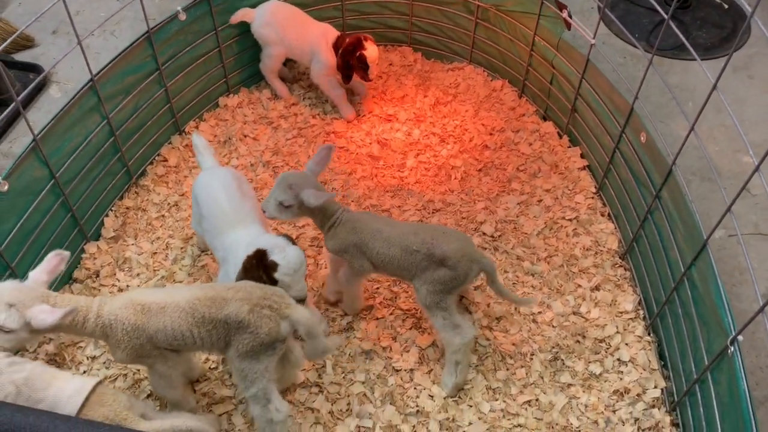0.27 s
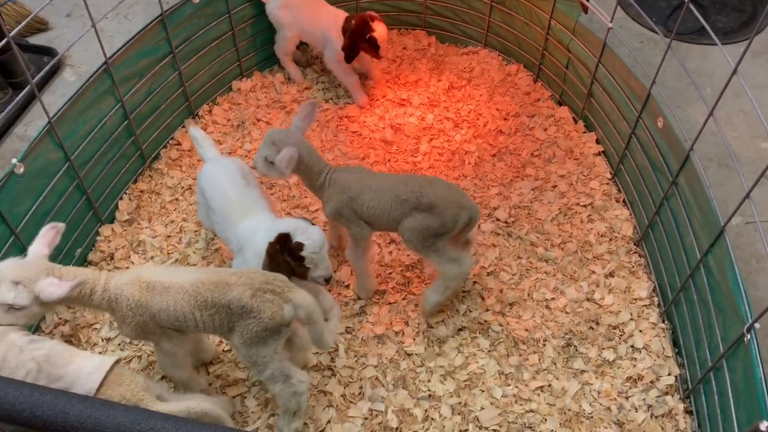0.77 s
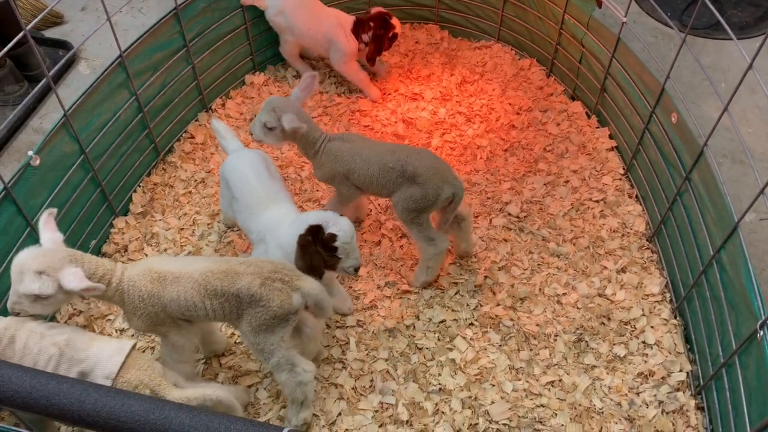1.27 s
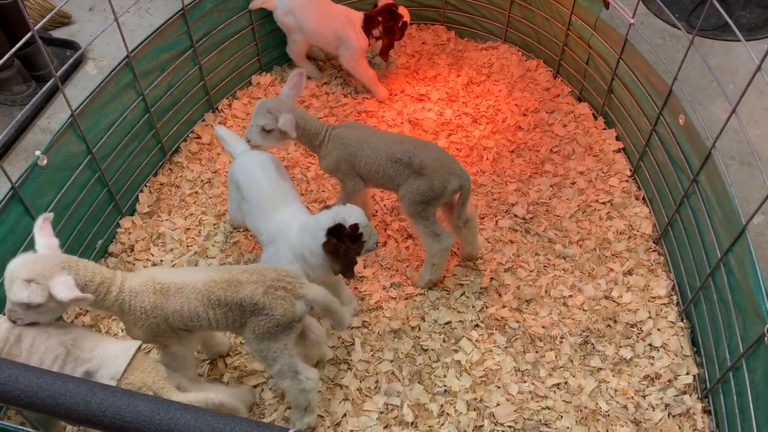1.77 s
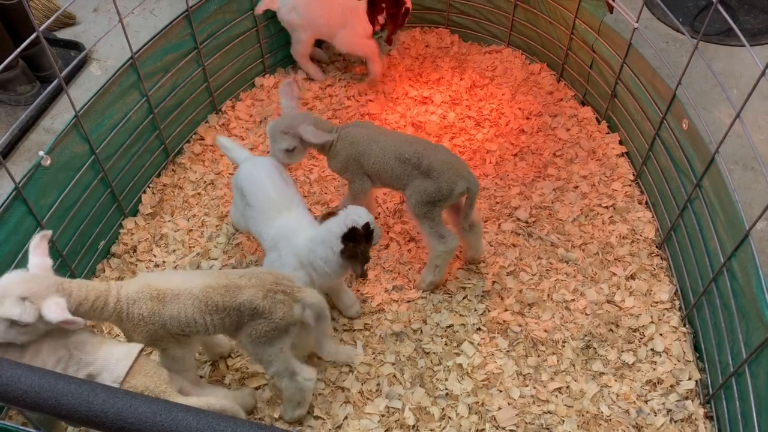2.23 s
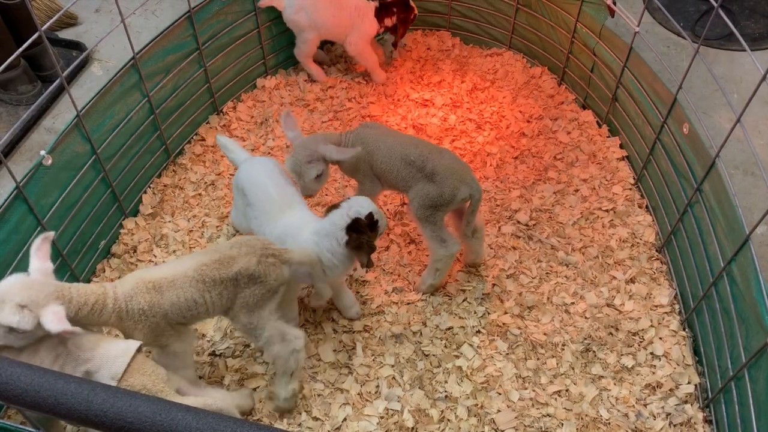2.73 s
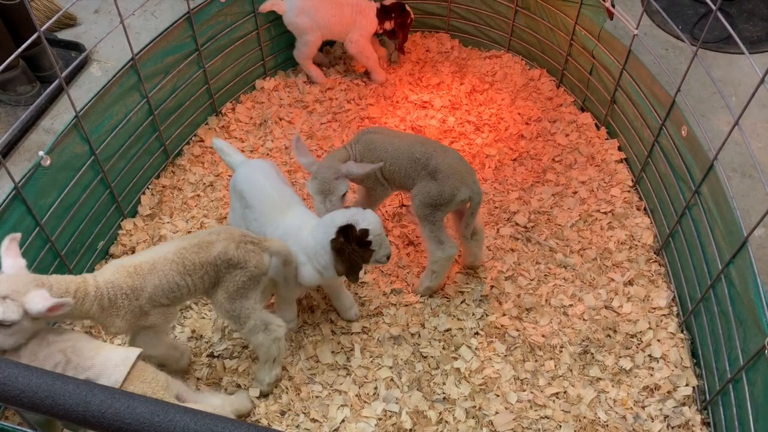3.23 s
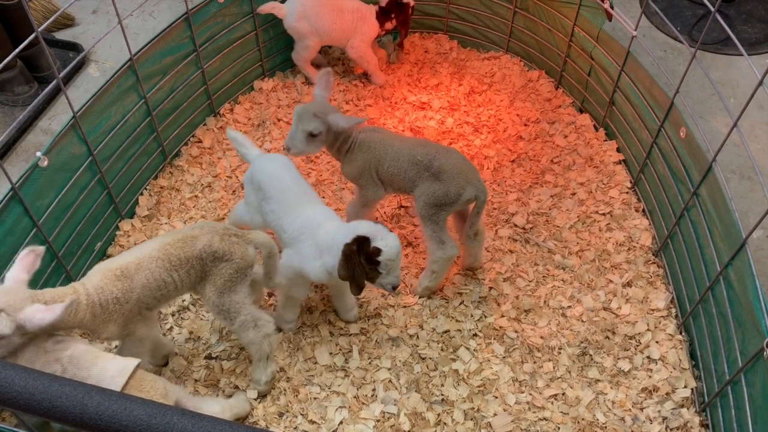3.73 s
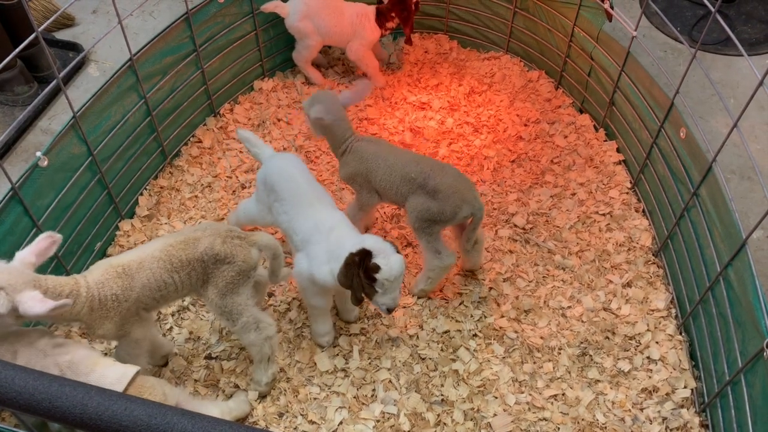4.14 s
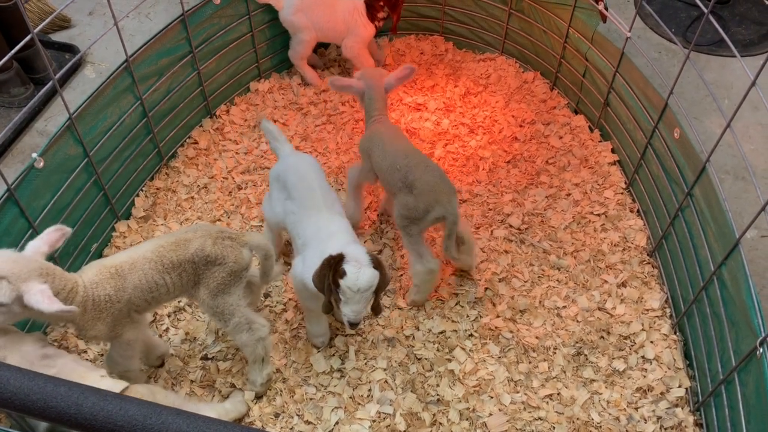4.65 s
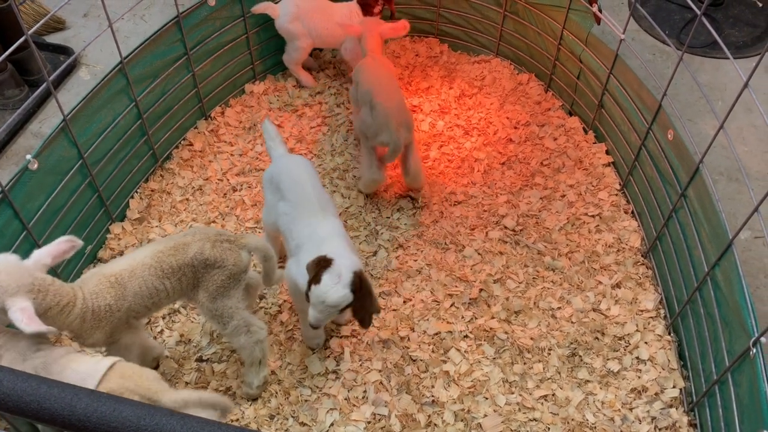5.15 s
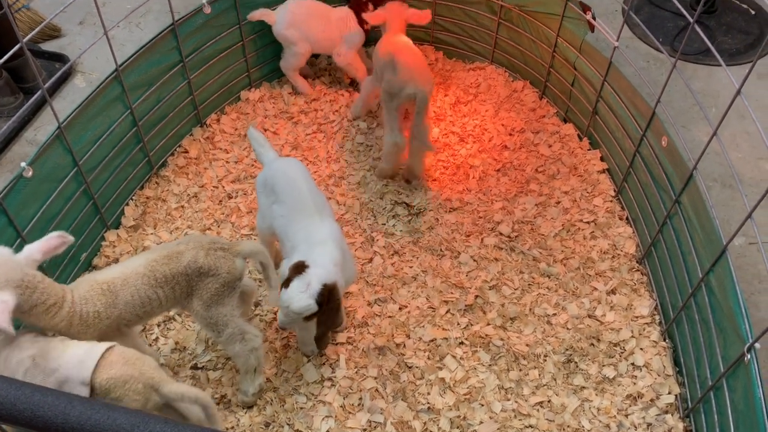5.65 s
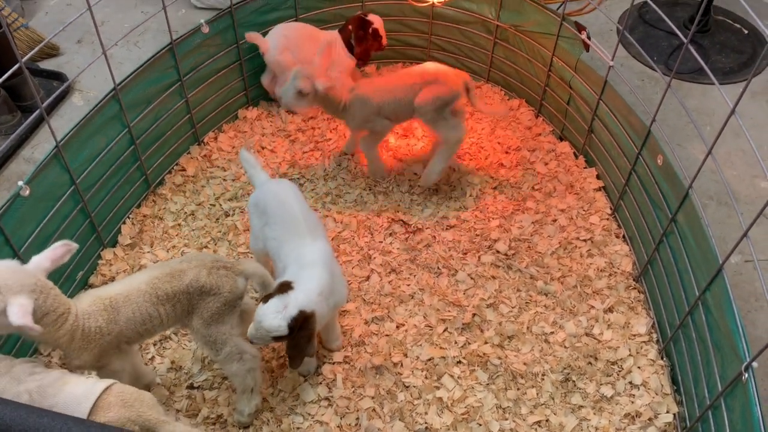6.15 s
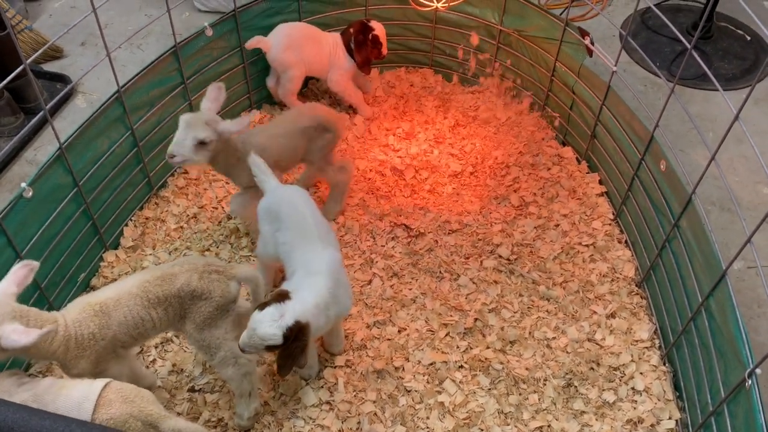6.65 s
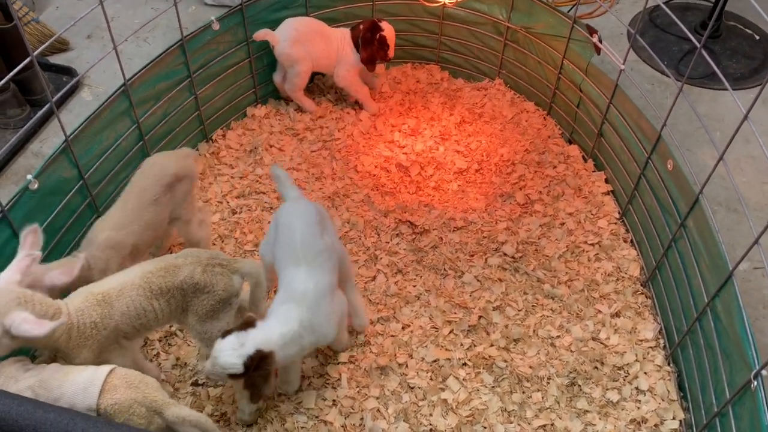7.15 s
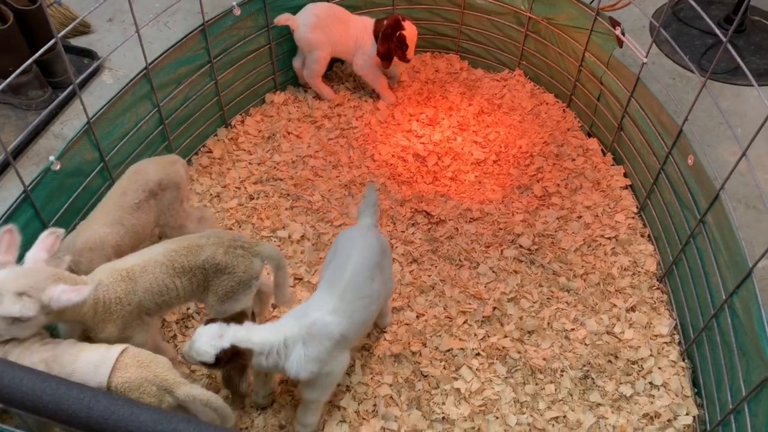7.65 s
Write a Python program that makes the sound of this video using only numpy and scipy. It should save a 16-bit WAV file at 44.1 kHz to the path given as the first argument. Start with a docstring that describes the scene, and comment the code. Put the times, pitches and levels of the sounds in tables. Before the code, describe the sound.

The tail end of a lamb's bleat echoes in a barn, then small hooves rustle and crackle through wood shavings over a low hum.

```python
"""Lamb's bleat and young animals in wood shavings

The end of a lamb's bleat, harmonics through moving throat resonances, rings out in a barn's noise tail.
Young animals then shuffle (banded clicks and hiss), snap flakes (ringing bursts), land hooves (decaying
modes) and scrape (resonant grains) inside a wire pen. Hum lines and ventilation noise lie behind.
Two microphone ports hear the treble a fraction of a millisecond apart."""
import sys
import numpy as np
from scipy import signal
from scipy.fft import rfft, irfft, next_fast_len
from scipy.io import wavfile
from scipy.ndimage import uniform_filter1d

SR = 44100
rng = np.random.default_rng(int(sys.argv[2]) if len(sys.argv) > 2 else 0)


def transcribe(u):
    """Save the signal u as a 16-bit wav file named by the first command-line argument.

    u: samples, shape (n,) or (channels, n), limited to [-1, 1]; the rate is SR.
    q: integer samples, one column per channel.
    """
    v = np.clip(np.atleast_2d(u).T, -1, 1)
    q = np.round(v * 32767).astype(np.int16)
    wavfile.write(sys.argv[1], SR, q)


N = 347949
T = np.arange(N) / SR

# vocal folds and throat over time: t/s, pitch f/Hz, level/dB, roughness 0-1, middle resonance/dB,
# upper resonance f/Hz, upper resonance/dB, half-pitch lines/dB
CALL = [(0, 764.4, -27, .02, -10, 5260, 1.5, -40), (.014, 766, -25.5, .02, -10, 5400, 0, -40),
        (.024, 770, -29.5, .015, -11, 5500, 0, -40), (.033, 789, -22, .01, 3, 5600, -7, -40),
        (.04, 793, -21, .01, 5, 5630, -8, -40), (.049, 794.7, -23.5, .01, -.5, 5940, -7, -40),
        (.059, 797.2, -20.5, 0, -2.5, 6200, -6.5, -40), (.069, 789.4, -24, .025, -1.5, 6300, -5, -30),
        (.075, 750, -30, .1, -3, 6500, -5, -12), (.087, 748, -26.5, .08, -10, 6500, -11, -13),
        (.096, 715, -36, .22, 2, 5900, -4, -12), (.105, 675, -34, .2, 7, 5450, 0, -11),
        (.111, 640, -32, .2, -5, 5450, -6, -9), (.119, 593.6, -26, .07, -20, 5400, -15, -12),
        (.128, 585.4, -32, .12, -20, 5400, -18, -12), (.135, 585, -44, .3, -12, 5400, -12, -8),
        (.165, 573, -55, .45, -8, 5200, -5, -6)]


def undb(db):
    """dB to gain."""
    return 10 ** (np.asarray(db) / 20)


def level(x, db):
    """Set the rms level."""
    return x * undb(db) / np.sqrt(np.mean(x ** 2))


def colour(x, points):
    """Shape a spectrum by (f/Hz, gain/dB) points, interpolated over log frequency."""
    hz, db = np.transpose(points)
    size = next_fast_len(N)
    f = np.maximum(np.arange(size // 2 + 1) * SR / size, 1)
    gain = undb(np.interp(np.log(f), np.log(hz), db))
    return irfft(rfft(x, size) * gain, size)[:N]


def walk(rate, size=N):
    """Random levels held 1 / rate s and slewed twice; spread near 1."""
    k = int(SR / rate)
    held = np.repeat(rng.standard_normal(size // k + 1), k)
    return 1.3 * uniform_filter1d(uniform_filter1d(held, k), k)[:size]


def add(out, s, x):
    """Mix x into out from time s."""
    part = out[int(s * SR):int(s * SR) + len(x)]
    part += x[:len(part)]


def resonate(x, hz, q):
    """Ring x through one resonance."""
    return signal.lfilter(*signal.iirpeak(hz, q, fs=SR), x)


def earlier_bleat():
    """The call was already sounding, so the barn is full of it: nine harmonics with a wavering pitch."""
    length_s, call_db, wobble = .25, -28, .012  # wobble: fraction of pitch
    t = T[:int(length_s * SR)]
    hz = CALL[0][1] * (1 + wobble * walk(30, size=len(t)))
    phase = 2 * np.pi * np.cumsum(hz) / SR
    shares_db = [-25, -2.0, -7, -12, -3, -1, -6, -7, -4]  # harmonics 1 to 9
    return undb(call_db) * sum(undb(db) * np.sin((k + 1) * phase) for k, db in enumerate(shares_db))


def bleat():
    """Vocal-fold harmonics weighted by throat resonances; roughness shakes them and lets breath through."""
    # resonance widths/Hz: lowest (moving), middle (fixed), upper (moving), top (fixed)
    widths_hz = (700, 1400, 1900, 3000)
    mouth_hz, mouth_rise_hz_per_s, middle_hz = 1550, 1060, 4000  # the lowest resonance climbs
    top_hz, top_db, top_fade_db_per_s = 9940, -19.5, 45  # the top resonance fades steadily through the call
    floor_db, breath_db = -17.5, -5
    s, *columns = np.transpose(CALL)
    t = T[T < s[-1]]
    hz, db, rough, mid_db, high_hz, high_db, half_db = (np.interp(t, s, c) for c in columns)
    low_hz = mouth_hz + mouth_rise_hz_per_s * t
    rough = np.clip(rough, 0, 1)
    centres_hz = (low_hz, middle_hz, high_hz, top_hz)
    gains_db = (0, mid_db, high_db, top_db - top_fade_db_per_s * t)

    def throat(f):
        """Gain at f: steep-sided peaks; a small mouth radiates little under its first resonance."""
        peaks = [undb(g) / (1 + (2 * (f - c) / w) ** 2) ** 2
                 for c, w, g in zip(centres_hz, widths_hz, gains_db)]
        floor = undb(floor_db) / (1 + (f / 7000) ** 6)
        return (sum(peaks) + floor) * np.minimum(f / low_hz, 1) ** 1.8

    phase = 2 * np.pi * np.cumsum(hz * (1 + 0.1004 * rough * walk(300, size=len(t)))) / SR
    voice = 0
    for k in np.arange(2, 37) / 2:  # unequal alternate pulses add lines half-way between harmonics
        shake = np.sqrt(1 - rough ** 2) + 0.46 * rough * walk(250, size=len(t))
        # phases staggered so the harmonics' peaks do not pile up
        line = np.sin(k * phase - np.pi * k ** 2 / 8)
        voice = voice + throat(k * hz) * shake * undb(half_db * (k % 1 > 0)) * line
    for f in range(1000, 12000, 250):  # breath: narrow noise bands through the same throat
        band = resonate(rng.standard_normal(len(t)), f, f / 300)
        voice = voice + throat(f) * rough * level(band, breath_db)
    return np.pad(voice * undb(db), (0, N - len(t)))


def barn(x, before):
    """Dense noise tail that builds up as the walls answer; each band decays at its own rate."""
    # echo bands: f/Hz, t60/s, level/dB, build-up time/s
    bands = [(500, .19, 0, .014), (1600, .56, -4, .045), (4000, .62, 0, .014), (8000, .36, 1, .012),
             (14000, .15, -4, .014)]
    barn_db = -13
    wander_s, wander_per_s = .00012, 120  # moving bodies and air blur the pitch that reaches the walls
    t, tail = T[:SR], 0
    for hz, t60_s, db, build_s in bands:
        decay = undb(db - 60 * t / t60_s) * (1 - np.exp(-(t / build_s) ** 2))
        tail = tail + resonate(rng.standard_normal(SR), hz, .8) * decay
    x = np.concatenate([before, x])
    at = np.arange(len(x))
    x = np.interp(at + SR * wander_s * walk(wander_per_s, size=len(x)), at, x)
    wet = signal.fftconvolve(x, undb(barn_db) * tail / np.sqrt(np.sum(tail ** 2)))
    return wet[len(before):len(before) + N]


def background():
    """Wavering hum over broad ventilation noise; returns the shared and the differing part."""
    # common level of hum and air over time: t/s, gain/dB
    gain_points = [(0, -11), (.1, -7.5), (.3, -2), (.6, -3.5), (.8, 0), (2, 0.5), (3.5, 0), (4.8, -1),
                   (5.3, 1.5), (6, 3.5), (6.6, 5.5), (7.2, 3), (7.89, 4)]
    # hum lines: f/Hz, rms before the common gain/dB, waver/dB
    hum_lines = [(119.8, -57.6, 1.6), (241, -79, 2.5), (274.3, -75, 3), (310.6, -73.5, 3),
                 (359.6, -63, 1.8), (171, -73.5, 1)]
    # ventilation spectrum: f/Hz, relative density/dB
    air_points = [(15, -45), (28, -21), (55, -1.5), (90, -10.5), (150, -14.5), (300, -10), (420, -15),
                  (560, -20), (750, -14.5), (1000, -15), (1500, -18), (2500, -33.5), (4500, -25),
                  (7500, -46), (8700, -32), (10200, -36), (11000, -48), (16000, -45)]
    # share of air that differs between the ports: f/Hz, gain/dB
    apart_points = [(30, -23), (100, -11.5), (300, -8.5), (650, 0.5), (1400, -7), (2600, 6.5), (4000, -23),
                    (8000, 2)]
    air_db = -60  # rms before the common gain
    common_gain = undb(np.interp(T, *np.transpose(gain_points)))
    hum = 0
    for hz, db, waver_db in hum_lines:
        wander = 0.091 * waver_db * walk(4.8)  # phase/rad
        line = np.sin(2 * np.pi * hz * T + rng.uniform(0, 2 * np.pi) + wander)
        hum = hum + level(line, db) * undb(waver_db * walk(7))
    shared, apart = (level(colour(rng.standard_normal(N), air_points), air_db) for _ in range(2))
    return common_gain * (hum + shared), common_gain * colour(apart, apart_points)


def stirring():
    """Pushes swell and die steadily in dB over faint settling; returns crisp, dull and fine rustle gains."""
    # feet pushing through shavings: peak t/s, crisp peak/dB, 10 dB rise/s, 10 dB fall/s,
    # dull share/dB, fine share/dB
    pushes = [(0.361, -57, 0.3, 0.217, 0, -10), (0.486, -56.5, 0.1, 0.05, -2, -1.0),
              (0.767, -52.0, 0.04, 0.05, -3, -5.5), (0.969, -52.5, 0.227, 0.158, -4, -3.0),
              (1.241, -54.5, 0.06, 0.103, 0, -4.5), (1.381, -56.5, 0.17, 0.05, -10.0, -4.5),
              (1.551, -60.5, 0.032, 0.023, -3.5, -5.5), (1.64, -56.5, 0.006, 0.12, 0, -26),
              (1.891, -52.5, 0.05, 0.058, -8, -3.0), (2.213, -50.5, 0.12, 0.049, -5.5, -4.0),
              (2.388, -55, 0.01, 0.04, -11, -1.5), (2.551, -54.0, 0.099, 0.041, -3.5, -4.5),
              (2.794, -50.5, 0.0551, 0.053, -4.5, -2.5), (2.883, -50, 0.049, 0.055, -3.5, -5.5),
              (3.105, -62, 0.02, 0.05, -5, -5), (3.15, -60.5, 0.04, 0.046, -3, -7),
              (3.498, -68, 2.14, 0.7, 1.5, -15), (3.695, -53.5, 0.013, 0.053, 0.5, -6),
              (3.788, -62.5, 0.07, 0.14, -6.0, -7.0), (4.045, -53.5, 0.025, 0.09, -2, -4),
              (4.17, -61, .05, .08, -3, -6), (4.337, -51.5, 0.03, 0.037, -9, -6),
              (4.514, -54.5, 0.18, 0.12, -1, -2.0), (4.725, -56.0, 0.07, 0.1, 1.0, -4.5),
              (4.82, -49, 0.06, 0.11, -5, -3.0), (5.011, -47.5, 0.039, 0.08, -2.5, -1),
              (5.144, -47, 0.126, 0.06, -7.5, -7.0), (5.334, -47.5, 0.048, 0.106, -5.5, -4),
              (5.522, -47.0, 0.006, 0.1, -7.5, -5), (5.705, -49.5, 0.015, 0.405, -3.5, -1.5),
              (5.921, -43.5, 0.06, 0.08, -9, -0.5), (6.077, -56, 0.36, 0.088, -2, -4),
              (6.177, -45, 0.023, 0.09, -0.5, -2.5), (6.254, -42, 0.054, 0.07, -6.5, -1.0),
              (6.37, -46, 0.09, 0.02, -6, -0.5), (6.436, -43, 0.03, 0.05, -12, -7),
              (6.57, -52, .015, .06, -3, -5), (6.664, -45, 0.118, 0.054, -2.5, -3.0),
              (6.772, -51.0, 0.071, 0.16, -3, -3.5), (6.884, -47.0, 0.018, 0.08, -3.0, -9.5),
              (6.94, -46, 0.03, 0.04, -11, -2.5), (7.02, -50.5, 0.026, 0.04, -1.5, -3),
              (7.142, -46.0, 0.08, 0.12, -3, -4.5), (7.297, -52.5, 0.1, 0.043, -5.0, -3.0),
              (7.5, -47.5, 0.099, 0.061, -1, -3.5), (7.651, -53.0, 0.15, 0.192, -2, -7)]
    settling_db = [[-78], [-77], [-86]]  # crisp, dull, fine
    total, t = undb(settling_db) ** 2, T[::32]
    for s, db, rise_s, fall_s, dull_db, fine_db in pushes:
        push = undb(db - 10 * np.where(t < s, (s - t) / rise_s, (t - s) / fall_s))
        total = total + (push * undb([[0], [dull_db], [fine_db]])) ** 2
    return [np.interp(T, t, np.sqrt(row)) for row in total]


def crackle(per_s, spread_db, points, patchy_db):
    """Flakes of each size click in their own band and flurries, over a hiss; sizes uneven but bounded."""
    out, together = 0, walk(90)
    low_hz, high_hz = points[1][0], points[-2][0]
    for hz in low_hz * 1.38 ** np.arange(np.log(high_hz / low_hz) // np.log(1.4) + 1):
        on = rng.random(N) < per_s / SR
        count = on.sum()
        size_db = spread_db * np.minimum(rng.exponential(size=count), 5.5)
        clicks = np.zeros(N)
        clicks[on] = rng.choice([-1, 1], count) * undb(size_db)
        grit = level(clicks, 0) + level(rng.standard_normal(N), -1.8)
        grit = grit * undb(1.1 * together + patchy_db * walk(35))
        out = out + resonate(grit, hz, 2.2) / np.sqrt(hz)
    return level(colour(out, points), 0)


def shavings(crisp, dull, fine):
    """Dry flakes crackle, finer dust hisses above them, heavier pushes add a dull scrape."""
    # flake spectrum: f/Hz, relative density/dB
    flake_points = [(1200, -14), (2500, -9.5), (4200, 1), (5200, 1.5), (6300, .5), (7500, -2.5), (9000, -2),
                    (10500, -4), (12500, -2.5)]
    # dust spectrum: f/Hz, relative density/dB
    dust_points = [(5000, -21), (7500, -7), (9000, -3), (10500, -4.5), (12000, -4), (16000, 4)]
    scrape_points = [(400, -2.5), (800, -6.5), (1500, -1), (2400, -3), (4000, -40)]  # f/Hz, gain/dB
    flakes_db, dust_db, scrape_db = -0.37, 3, -2.5
    scrape = crackle(700, 2.9, scrape_points, patchy_db=3.0)
    flakes = crackle(1500, 2.9, flake_points, patchy_db=3.0)
    dust = crackle(2500, 3.5, dust_points, patchy_db=2.2)
    return crisp * undb(flakes_db) * flakes + fine * undb(dust_db) * dust + dull * undb(scrape_db) * scrape


def snaps(crisp):
    """Flakes crack and ring briefly while crumbs rattle; small snaps fall at random, scaled by the rustle."""
    # loud single flakes: onset t/s, level/dB, ring f/Hz, ring length/cycles (peak at half of it)
    loud = [(.3117, -42, 5430, 2), (.3945, -43, 9000, 1.5), (.82, -43, 6360, 2), (.9622, -40, 11100, 2),
            (.9847, -39, 7750, 2), (1.5224, -44, 5160, 2.5), (1.641, -49, 4000, 2), (1.8635, -45, 6260, 2),
            (2.1929, -25, 9500, 3), (2.2022, -35, 6500, 2.5), (2.383, -44, 7560, 2),
            (2.5362, -43, 12000, 2), (2.5451, -32.5, 5200, 2.5), (2.5555, -41, 5500, 2),
            (2.579, -43, 13000, 3), (2.7921, -31, 9500, 2), (2.8644, -39, 6360, 2), (3.0973, -51, 8500, 2),
            (3.4081, -50, 6000, 1.5), (3.4779, -44, 8500, 2), (3.683, -48, 6000, 2), (3.8989, -52, 5860, 2),
            (4.0127, -48, 5000, 2), (4.0347, -45, 9000, 2), (4.083, -40, 8800, 3), (4.145, -38, 5500, 2),
            (4.3031, -46, 9000, 2.5), (4.3316, -30, 7500, 2.5), (4.795, -30, 7600, 2),
            (4.8797, -40, 14000, 2), (5.1741, -24, 7500, 1.5), (5.3594, -36, 11000, 2),
            (5.5172, -33, 5000, 1.5), (5.5182, -31, 6900, 8), (5.5474, -36, 7020, 3),
            (5.6984, -34, 9000, 4), (6.0771, -37, 7130, 3), (6.1749, -32, 6160, 2), (6.2594, -34, 6040, 2),
            (6.362, -36, 4500, 2), (6.4378, -23.5, 6000, 1.5), (6.6583, -33, 7130, 2),
            (6.8658, -34, 3900, 2), (7.0155, -33.5, 6360, 3), (7.1417, -33, 5720, 2),
            (7.2975, -38, 10000, 2), (7.3856, -34, 11000, 1.5), (7.8256, -45.5, 6390, 2)]
    small_per_s, small_hz, small_cycles = 30, 10000, 2
    small_db, small_spread_db = 9, 4  # above the rustle of the moment
    ring_db, crack_db, crumbs_db, crumbs_t60_s = 0, 3, -13, .03
    build_s = .001  # a flake creaks this long before it breaks
    out, t = np.zeros(N), T[:SR // 40]
    small = []
    for when, size, pitch in rng.random((int(small_per_s * N / SR), 3)):
        rustle_db = 20 * np.log10(crisp[int(when * N)])
        db = rustle_db + small_db + small_spread_db * (2 * size - 1)
        small.append((.001 + when * T[-1], db, small_hz * 2 ** (pitch - .5), small_cycles))
    for s, db, hz, cycles in list(loud) + small:
        turns = 2 * hz * t / cycles  # the ring swells, then fades
        ring = undb(ring_db) * np.sin(2 * np.pi * hz * t) * turns * np.exp(1 - turns)
        crack = undb(crack_db) * np.diff(np.exp(-t * SR / 2), prepend=0)
        crumbs = resonate(rng.standard_normal(len(t)), hz, 1.2) * undb(crumbs_db - 60 * t / crumbs_t60_s)
        add(out, s, undb(db) * crumbs * np.minimum(t / build_s, 1))
        add(out, s + build_s, undb(db) * (ring + crack))
    return out


def wire(x):
    """The pen wire scatters treble for a few milliseconds, differently on each call."""
    wire_db, t60_s, low_cut_hz = -7, .008, 3000
    t = T[:SR // 100]
    burst = rng.standard_normal(len(t)) * undb(-60 * t / t60_s)
    bright = signal.lfilter(*signal.butter(2, low_cut_hz, "high", fs=SR), x)
    return signal.fftconvolve(bright, undb(wire_db) * burst / np.sqrt(np.sum(burst ** 2)))[:N]


def hooves():
    """A soft push rings the bedded floor and the slab under it, and crunches the bedding."""
    # landings: t/s, level/dB, crunch/dB, slab/dB, nominal main mode f/Hz
    landings = [(0.759, -56, -5, -19, 138), (1.645, -47, -7, -21, 190.5), (2.179, -50, -8, -17, 165),
                (5.149, -45, -2, -2, 134), (5.208, -43.5, -7.5, 1, 136), (5.259, -45, -9, -3, 163.5),
                (5.309, -49, -7, 7, 135), (5.401, -46.5, -16, 0, 136), (5.531, -55, -9, -12, 133),
                (6.176, -31.5, -13, -12.5, 155), (6.24, -38.5, -18, -17, 156), (6.299, -43, -19, -15, 155),
                (6.345, -44, -19, -15, 150), (6.575, -35, -6, -2, 140), (6.628, -37, -4, -16, 138),
                (6.681, -38.5, -5, -18, 189), (6.739, -44.5, 3, -18, 135), (6.789, -42.5, -3.5, -19, 181)]
    # floor modes: multiple of the main mode, nominal level/dB, t60/s
    modes = [(1, -1, 0.28), (1.25, -4, 0.18), (1.75, -2.5, .1), (2.6, -3.5, 0.092)]
    slab_hz, slab_t60_s = 66, 0.35  # nominal pitch
    out, t = np.zeros(N), T[:SR // 2]
    for s, db, bright_db, deep_db, hz in landings:
        chance = rng.standard_normal((len(modes), 2))  # level and pitch scatter
        ring = 0
        for (multiple, mode_db, t60_s), (loud, sharp) in zip(modes, chance):
            mode_hz = hz * multiple * (1 + 0.032 * sharp)
            ring = ring + undb(mode_db + 2.2 * loud - 60 * t / t60_s) * np.sin(2 * np.pi * mode_hz * t)
        slab = np.sin(2 * np.pi * slab_hz * (1 + 0.23 * chance[0, 1]) * t)
        slab = slab * undb(deep_db - 60 * t / slab_t60_s)
        crunch = resonate(rng.standard_normal(len(t)), 620, .6) * undb(bright_db + 10.5 - 60 * t / 0.36)
        add(out, s - .006, undb(db - 2.0) * (1 - np.exp(-t / 0.0074)) * (ring + slab + crunch))
    return out


def scrapes():
    """A hoof scrapes flakes or wire: a flurry of grains rings one narrow resonance, swelling and fading."""
    # scrapes: centre t/s, rms before the swell/dB, f/Hz, length between 1/e points/s
    strokes = [(1.235, -62, 1760, .04), (2.20, -62, 1900, .04), (2.5, -56, 1810, .04),
               (2.88, -59, 2000, .04), (3.68, -63, 1900, .04), (5.315, -57, 1100, .04),
               (5.34, -58, 1620, .04), (5.53, -56, 1290, .04), (6.18, -50, 900, .025),
               (6.2, -49, 1190, .03), (6.6, -53, 700, .05), (6.77, -54, 750, .06), (6.28, -54, 1450, .03),
               (6.31, -55, 1150, .03), (6.35, -57, 1700, .03), (6.40, -58, 1170, .09),
               (6.437, -56, 1500, .025), (6.66, -53, 990, .04), (6.72, -55, 1310, .04),
               (7.49, -56, 1920, .04)]
    sharpness_q, grains_per_s = 10, 2000
    out, t = np.zeros(N), T[:SR // 5]
    for s, db, hz, length_s in strokes:
        grains = rng.standard_normal(len(t)) * (rng.random(len(t)) < grains_per_s / SR)
        ring = level(resonate(grains, hz, sharpness_q), db)
        add(out, s - .1, ring * np.exp(-(2 * (t - .1) / length_s) ** 2))
    return out


def scene():
    """The ports share most sound, shifted in phase; some air noise, echo and wire scatter differ."""
    # phase between ports: f/Hz, left lead/rad
    port_phase = [(0, 0), (450, -.3), (1400, -.1), (2000, .2), (4650, 3.14), (8900, 9.42), (13250, 15.7),
                  (17600, 22)]
    barn_apart_db = -4.5
    before, voice = earlier_bleat(), bleat()
    crisp, dull, fine = stirring()
    cracks = snaps(crisp)
    feet = shavings(crisp, dull, fine) + cracks + hooves() + scrapes()
    shared, apart = background()
    far = voice + 0.45 * feet  # the pen wall keeps most of the foot noise from the barn
    apart = apart + undb(barn_apart_db) * barn(far, before)
    f = np.arange(N // 2 + 1) * SR / N
    turn = np.exp(.5j * np.interp(f, *np.transpose(port_phase)))
    whole = rfft(voice + feet + barn(far, before) + shared)
    left = irfft(whole * turn, N) + apart + wire(cracks)
    right = irfft(whole / turn, N) - apart + wire(cracks)
    return np.array([left, right])


def record(dry):
    """The phone cuts the top with a steep elliptic low-pass."""
    top_hz = 15680
    return signal.sosfilt(signal.ellip(10, .2, 60, top_hz, fs=SR, output="sos"), dry)


dry = scene()
out = record(dry)
transcribe(out)
```